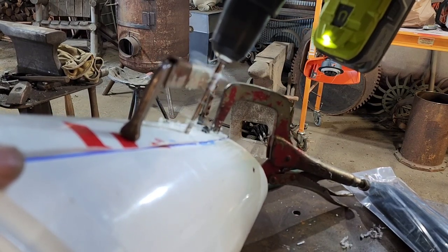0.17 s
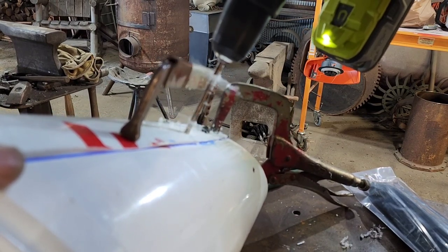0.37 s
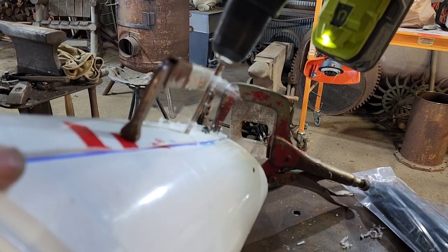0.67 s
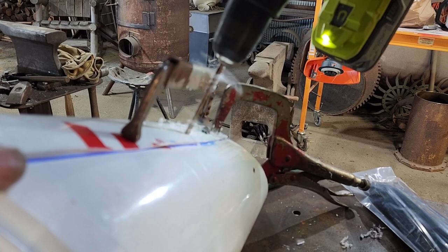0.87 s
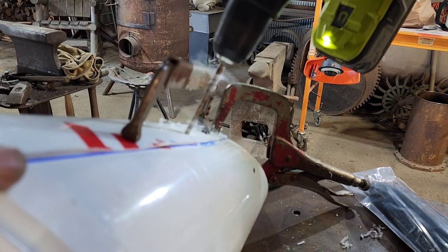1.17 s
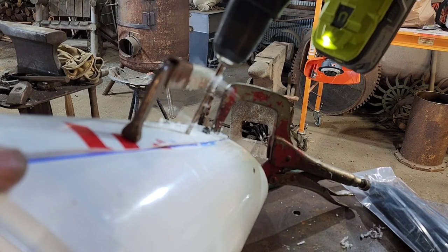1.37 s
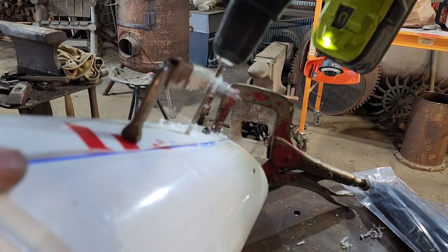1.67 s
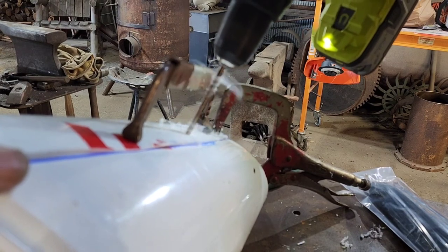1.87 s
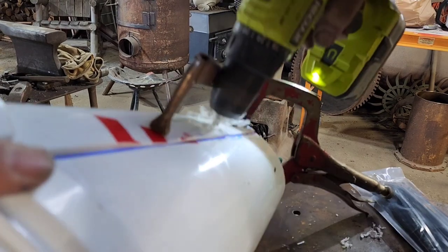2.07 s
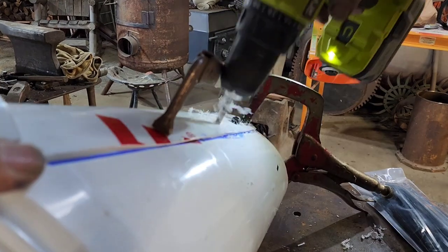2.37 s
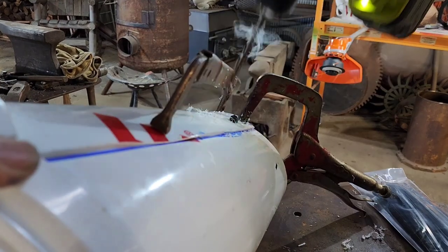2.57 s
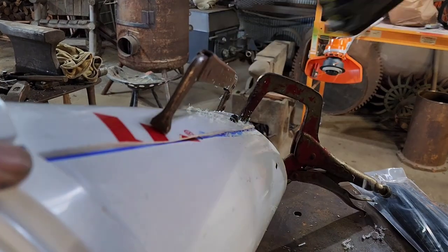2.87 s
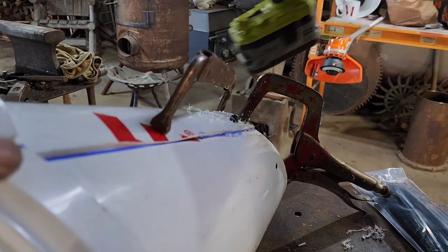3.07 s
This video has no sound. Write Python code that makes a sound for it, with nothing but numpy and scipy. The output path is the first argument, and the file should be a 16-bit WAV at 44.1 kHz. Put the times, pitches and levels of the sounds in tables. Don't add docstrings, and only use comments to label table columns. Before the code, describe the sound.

Cordless drill cutting hollow plastic, breaking through with booming knocks and a scrape before stopping abruptly.

```python
import sys
import numpy as np
from scipy import signal
from scipy.fft import rfft, irfft, next_fast_len
from scipy.io import wavfile
from scipy.ndimage import uniform_filter1d, map_coordinates

SR = 44100
rng = np.random.default_rng(int(sys.argv[2]) if len(sys.argv) > 2 else 0)


def master(y):
    cut = np.clip(np.atleast_2d(y).T, -1, 1)
    pcm = np.round(cut * 32767)
    wavfile.write(sys.argv[1], SR, pcm.astype(np.int16))


def ratio_of_db(decibels):
    return 10 ** (np.asarray(decibels, float) / 20)


N = 141120
T = np.arange(N) / SR

# (time [s], gear whine [Hz], whine level [dB], motor level [dB])
DRIVE = [(0, 3063, -34.5, -18), (1, 3054, -35, -18), (1.75, 3046, -34.5, -17.5), (1.98, 3042, -33.5, -18.5),
         (2.12, 3006, -36, -17), (2.2, 2935, -29, -15.5), (2.3, 2977, -33.5, -15.5), (2.45, 2974, -35, -15),
         (2.575, 2986, -34, -17), (2.6, 3013, -44, -18), (2.8, 3019, -60, -21)]
# (frequency [Hz], width [Hz], level [dB])
SHELL_MODES = [(250, 80, -14), (310, 50, -3), (368, 45, 0), (435, 70, -6), (620, 120, -12), (790, 160, -13),
               (1300, 600, -11), (1900, 500, -12)]

WHINE_ORDER = 132
LIFT_S, PRESS_S, FREE_S, FADE_S = 2, 2.16, 2.57, 0.083
CHATTER_PHASE_RAD = 4.1


def unit(x):
    return x / np.sqrt(np.mean(x ** 2) + 1e-20)


def along(points, hz):
    f, v = np.transpose(points)
    return np.interp(np.log(hz + 1), np.log(f + 1), v)


def curves(rows):
    s, *cols = np.transpose(rows)
    return [np.interp(T, s, c) for c in cols]


def wobble(rate_hz):
    return map_coordinates(rng.standard_normal(int(N * rate_hz / SR) + 4), [T * rate_hz])


def step(time_s, width_s):
    return np.clip((T - time_s) / width_s + .5, 0, 1)


def filtered(x, response):
    m = next_fast_len(N + SR // 2)
    return irfft(rfft(x, m) * response(np.fft.rfftfreq(m, 1 / SR)), m)[..., :N]


def resonant(peaks):
    def response(f):
        total = 0
        for k, (centre, width, db) in enumerate(peaks):
            damping = 1j * f * width
            total = total + (-1) ** k * ratio_of_db(db) * damping / (centre * centre - f * f + damping)
        return total
    return response


def pair(a, b):
    # (frequency [Hz], left-right likeness [-1..1])
    likeness = [(30, .7), (60, .9), (300, .92), (700, .45), (2500, .4), (6000, .3), (12000, .2)]
    # (frequency [Hz], left minus right [dB])
    left_lean = [(40, 1), (180, 0), (350, -4.5), (700, 1.5), (1400, -0.5), (2800, 5), (5600, 1.2),
                 (14000, 4.5)]
    # (frequency [Hz], left leads by [rad])
    left_lead = [(60, 0.34), (350, 0.68), (700, 0.64), (3000, 1.4), (8000, 1.64)]

    def spread(hz):
        return np.arccos(np.clip(along(likeness, hz), -1, 1)) / 2

    def port(hz):
        ratio = ratio_of_db(along(left_lean, hz) / 2) * np.exp(.5j * along(left_lead, hz))
        return ratio ** np.array([[1], [-1]])

    mid = filtered(a, lambda hz: np.cos(spread(hz)))
    side = filtered(b, lambda hz: np.sin(spread(hz)))
    return filtered(np.array([mid + side, mid - side]), port)


def turns():
    return np.cumsum(curves(DRIVE)[0] / WHINE_ORDER) / SR


def running():
    stop_s, stop_t60_s = 2.826, 0.024
    return ratio_of_db(-60 * np.clip(T - stop_s, 0, None) / stop_t60_s)


def rattle(repeat, beat):
    angle, size = turns(), 1910
    drift = T * 2.583
    table = rng.standard_normal((int(drift[-1]) + 3, size))
    same = unit(map_coordinates(table, [drift, angle % 1 * (size - 1)], order=1))
    once = beat * np.cos(2 * np.pi * angle)
    twice = 0.96 * beat * np.cos(4 * np.pi * angle + 1.3)
    pulse = ratio_of_db(0.76 * wobble(60) + 0.62 * wobble(6.0)) * (1 + once + twice)
    share = np.clip(repeat, 0, 1)
    return pulse * (np.sqrt(share) * same + np.sqrt(1 - share) * rng.standard_normal(N))


def room_air():
    # (frequency [Hz], spectrum level [dB])
    air_slope = [(20, -9.5), (130, -3.5), (350, -15), (850, -19), (1600, -23), (5500, -32.5), (8500, -34),
                 (11000, -47)]
    noise = filtered(rng.standard_normal((2, N)), lambda f: ratio_of_db(along(air_slope, f)))
    return ratio_of_db(-56.5) * pair(*unit(noise))


def shop(x):
    # (frequency [Hz], t60 [s])
    room_t60 = [(100, 0.79), (400, 0.67), (2000, 0.52), (6000, 0.42), (15000, 0.36)]
    hz, t, z = signal.stft(rng.standard_normal((2, SR)), SR, nperseg=256)
    decay = ratio_of_db(-60 * t / along(room_t60, hz)[:, None])
    tail = signal.istft(z * decay, SR, nperseg=256)[1]
    late = np.pad(x, ((0, 0), (300, 0)))
    return signal.fftconvolve(late, tail / np.linalg.norm(tail[0]), axes=1)[:, :N]


def bench_jolts():
    # (time [s], level [dB])
    jolt_rows = [
        (2.112, -32),
        (2.189, -36),
        (2.85, -36.5),
        (2.885, -42.5),
    ]
    jolts = np.zeros(N)
    for s, db in jolt_rows:
        jolts[round(s * SR):][:200] += ratio_of_db(db + 12) * np.hanning(200)
    return filtered(jolts, resonant([(45, 34, -0.5), (120, 67, 0)]))


def lock():
    # (time [s], level [dB], t60 [s])
    clack_rows = [(2.207, -8, 0.01), (2.351, -8, .012), (2.807, -14, 0.036), (2.811, -12, 0.052),
                  (2.819, -15.5, 0.022), (2.823, -14, .012), (2.826, -5, 0.017), (2.836, -20, .02),
                  (2.843, -22, .015), (2.851, -19, 0.034), (3.103, -58, 0.022)]
    # (frequency [Hz], width [Hz], level [dB])
    lock_modes = [(1640, 340, -3), (3900, 550, -6), (5500, 210, 3), (6200, 560, -8), (8740, 540, -4),
                  (12000, 1500, -11), (14500, 1500, -9), (4870, 900, -8), (5380, 9, 0), (5470, 8, 3),
                  (5560, 8, 3), (5680, 10, 0)]
    out, t = np.zeros((2, N + SR)), np.arange(SR // 8) / SR
    for s, db, t60 in clack_rows:
        burst = ratio_of_db(db + 10.0 - 60 * t / t60) * rng.standard_normal((2, len(t)))
        out[:, round(s * SR):][:, :len(t)] += burst
    return filtered(out[:, :N], resonant(lock_modes)) * ratio_of_db([[1.2], [-1.2]])


def flute_scrape():
    # (time [s], level [dB], pitch [Hz])
    scrape_rows = [
        (2.575, -37, 801.6),
        (2.63, -30.5, 1100),
        (2.665, -29.5, 1301),
        (2.675, -26, 1074),
        (2.70, -24, 1150),
        (2.725, -21, 1175),
        (2.742, -44, 1190),
    ]
    level_db, pitch_hz = curves(scrape_rows)
    grains = rng.standard_normal(N) * ratio_of_db(4.2 * wobble(110))
    slow_grains = filtered(grains, lambda f: 1 / (1 + (f / 90) ** 2))
    sweep = 2 * np.pi * np.cumsum(pitch_hz) / SR
    squeal = unit(slow_grains * (np.sin(sweep) + 0.6 * np.sin(1.33 * sweep)))
    in_hole = step(scrape_rows[0][0], 0.026) * (T < scrape_rows[-1][0])
    return ratio_of_db(level_db) * in_hole * squeal


def chuck_bumps():
    # (time [s], push level [dB], crack level [dB])
    bump_rows = [(2.085, 0.5, -14.5), (2.109, -8, -42), (2.124, -13, -40), (2.158, 0, -24.5),
                 (2.166, -5.5, -30), (2.188, -10, -28.5), (2.198, -11, -22), (2.24, -14, -35),
                 (2.279, -2.5, -34), (2.32, -6.5, -41.5), (2.357, -13, -42), (2.383, -23, -42),
                 (2.4, -8, -42), (2.427, -4.5, -36), (2.445, -10.5, -38.5), (2.481, -17.5, -36),
                 (2.507, -9.5, -36), (2.531, -10, -40), (2.551, -8.5, -26), (2.568, -4.5, -26),
                 (2.581, -7, -31), (2.591, -6.5, -35), (2.608, -6, -22), (2.621, -2, -30),
                 (2.636, -9.5, -31), (2.651, -8.5, -30), (2.663, -12, -32.5), (2.677, -4, -25.5),
                 (2.687, -4.5, -20.5), (2.696, -6, -27), (2.71, -4.5, -15.5), (2.721, -3.5, -27),
                 (2.728, -10.5, -28), (2.754, -12.5, -41.5), (2.783, -32, -46), (2.809, -20, -43.5),
                 (3.045, -50.5, -55), (3.07, -45, -61)]
    blows, cracks, push = np.zeros(N), np.zeros(N), np.hanning(56)
    for s, db, crack_db in bump_rows:
        crack = ratio_of_db(crack_db + 34.0 - np.arange(300) / 9) * rng.standard_normal(300)
        cracks[round(s * SR):][:300] += crack
        blows[round(s * SR):][:len(push)] += ratio_of_db(db + 8.5) * push
    return filtered(blows, resonant(SHELL_MODES)) + filtered(cracks, resonant(SHELL_MODES[5:]))


def slips():
    slips_per_turn, scatter_slips, slip_share = 3, .25, .4
    count = np.floor(slips_per_turn * turns() + scatter_slips * wobble(40))
    lets_go = (np.diff(count, prepend=0) > 0) * ratio_of_db(0.88 * wobble(70))
    drag = np.sqrt(slip_share) * unit(lets_go) + np.sqrt(1 - slip_share) * rng.standard_normal(N)
    return uniform_filter1d(drag, size=24)


def chuck_rub():
    # (time [s], rub on the shell [dB], thrust on the bench [dB])
    rub_rows = [(2.09, -32, -32.5), (2.15, -26, -30.5), (2.2, -32, -28), (2.225, -39, -39),
                (2.3, -25.5, -37), (2.46, -26, -33.5), (2.54, -30.5, -40), (2.56, -21, -50),
                (2.73, -23.5, -44), (2.745, -40.5, -49)]
    # (frequency [Hz], width [Hz], level [dB])
    bench_modes = [(68, 25, -2), (132, 40, 0), (190, 80, -5)]
    rub_db, thrust_db = curves(rub_rows)
    touch = step(rub_rows[0][0], 0.0095) * running()
    rub = ratio_of_db(rub_db - 0.5) * unit(filtered(slips(), resonant(SHELL_MODES)))
    thrust = ratio_of_db(thrust_db + 3.5) * unit(filtered(rattle(0.59, 0.36), resonant(bench_modes)))
    return touch * (rub + thrust)


def shell_hum():
    # (frequency [Hz], spectrum level [dB])
    hum_slope = [(12, -41), (20, -17), (92, -10.5), (199, -8), (290, -2), (321, 1.5), (476, 0.5),
                 (1100, -4.5), (1200, 1), (1560, 1), (2640, -120)]
    takes = np.array([rattle(0.35, 0.05), rattle(0.15, 0.079)])
    hum = ratio_of_db(-30) * unit(filtered(takes, lambda f: ratio_of_db(along(hum_slope, f))))
    return hum * ratio_of_db(-4 * step(LIFT_S, 0.033)) * running()


def shell():
    hum = shell_hum()
    near = bench_jolts() + chuck_rub() + chuck_bumps() + flute_scrape()
    return pair(hum[0] + near, hum[1] + np.roll(near, 40))


def edge_chatter(press):
    bite = (1 + np.cos(2 * np.pi * turns() - CHATTER_PHASE_RAD)) ** 2
    ring = filtered(rattle(.9, 0) * bite, resonant([(1690, 110, 0)]))
    return (1 - press) * ratio_of_db(-31) * unit(ring)


def gear_tones(press):
    # (spindle multiple, level [dB])
    order_rows = [(1, -55), (3, -57), (12, -47), (13, -45), (16, -46), (21, -48), (64.5, -44), (72, -35.5),
                  (73, -48), (75, -38)]
    whine_db = curves(DRIVE)[1]
    angle = 2 * np.pi * turns()
    load_db = press * (4.5 + 1.5 * np.cos(angle))
    whine_phase = WHINE_ORDER * angle + .5 * wobble(45) + .45 * wobble(160)
    tones = ratio_of_db(whine_db + .8 + 1.5 * wobble(60) + load_db) * np.sin(whine_phase)

    bead_order, bead_db, bead_sharpness = 72.3, -33, 5
    swell = (1 + np.cos(angle - CHATTER_PHASE_RAD + .3 * wobble(20))) ** bead_sharpness
    bead = unit(swell * np.sin(bead_order * angle + .9 * wobble(35)))
    tones = tones + (1 - step(LIFT_S, .1)) * ratio_of_db(bead_db + 3 * wobble(12)) * bead

    for k, db in order_rows:
        level_db = db + 2 + 1.0 * wobble(6) + 1.27 * np.cos(angle - CHATTER_PHASE_RAD)
        tones = tones + (1 - press) * ratio_of_db(level_db) * np.sin(k * angle + 0.99 * wobble(5.42))
    return tones


def housing_rattle(press, free):
    # (frequency [Hz], width [Hz], lift [dB])
    cutting = [(600, -45), (1100, -19), (1500, -3), (2800, -12), (6500, -6.5), (8600, -8), (9600, -16.5),
               (15000, -8.5)], [(1694, 210, -3.5), (4140, 220, 3.5), (4695, 150, 6), (5830, 80, 1.5),
               (5960, 57, 7), (6520, 40, 9), (7780, 86, 7), (12270, 640, 5), (13800, 370, 2)]
    pressed = [(500, -26), (800, -9), (1800, -2.5), (3400, -8.5), (4200, -2.5), (8400, -4.5), (9800, -10),
               (15000, -8.5)], [(1754, 130, 5), (1840, 55, 6), (3100, 140, 2), (3860, 120, 0),
               (4220, 220, 4.5), (5640, 98, 5.5), (6170, 150, -4), (8340, 130, 5.5), (15300, 400, 7)]
    released = [(600, -42.5), (1100, -13), (1700, -5.5), (3000, -11), (4800, -6.5), (8000, -7),
                (10500, -14), (14000, -5.5)], [(4700, 360, 3), (6400, 170, 3), (7700, 330, 4.1),
                (13500, 500, 2)]
    trims = [3, 2.5, 2.5]
    shares = (1 - press, press - free, free)
    body = 0
    for (slope, peaks), share, trim_db in zip((cutting, pressed, released), shares, trims):
        def colour(f):
            lift_db = sum(db / (1 + (2 * (f - c) / w) ** 2) for c, w, db in peaks)
            return ratio_of_db(along(slope, f) + lift_db)

        takes = np.array([rattle(0.15, 0.022), rattle(0.15, 0.022)])
        body = body + np.sqrt(np.abs(share)) * ratio_of_db(trim_db) * unit(filtered(takes, colour))
    return body * ratio_of_db(curves(DRIVE)[2])


def motor():
    press, free = step(PRESS_S, FADE_S), step(FREE_S, FADE_S)
    body = housing_rattle(press, free) + edge_chatter(press)
    tones = gear_tones(press)
    return pair(body[0] + tones, body[1] + np.roll(tones, 3)) * running()


def scene():
    near = lock() + shell() + motor()
    return room_air() + ratio_of_db(-13) * shop(near) + near


def band_limit(x):
    return signal.sosfilt(signal.butter(12, 17060, fs=SR, output="sos"), x)


def record(dry):
    top_hz, slope_hz = 15740, 160
    limited = np.clip(dry, -1, 1)
    mix = filtered(limited, lambda hz: np.clip((top_hz - hz) / slope_hz + .5, 0, 1) ** 2)
    return band_limit(mix)


dry = scene()
out = record(dry)
master(out)
```